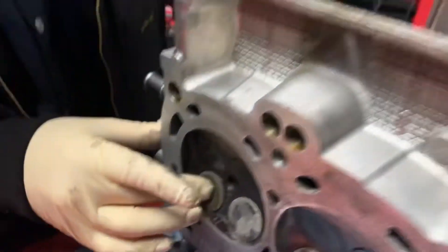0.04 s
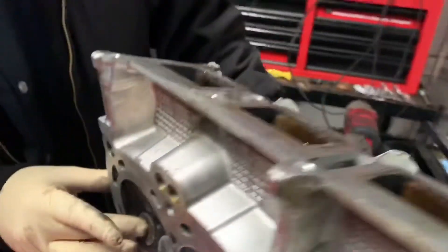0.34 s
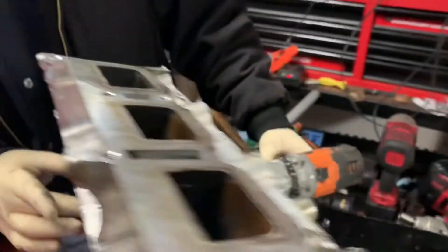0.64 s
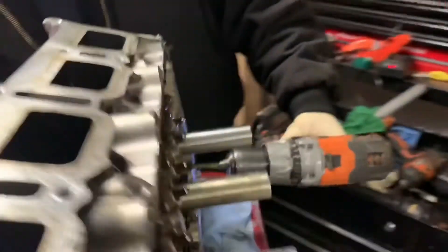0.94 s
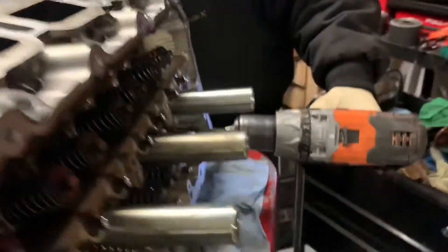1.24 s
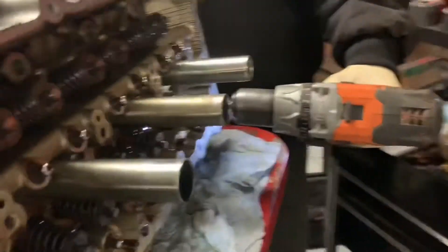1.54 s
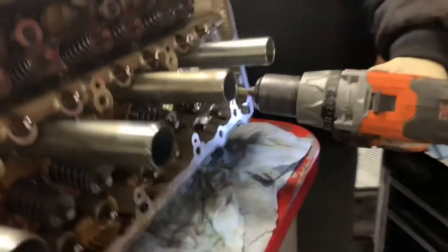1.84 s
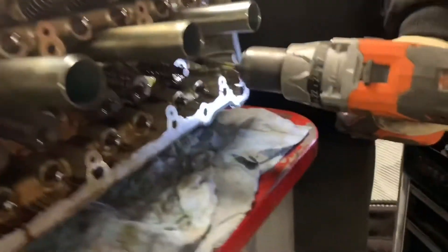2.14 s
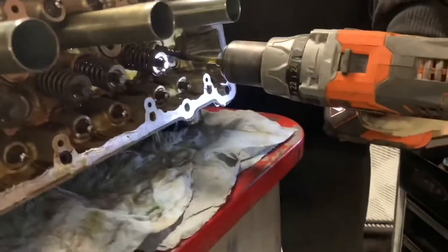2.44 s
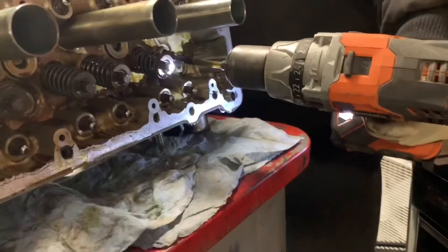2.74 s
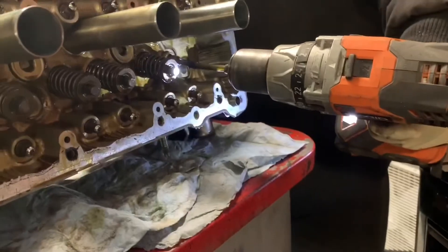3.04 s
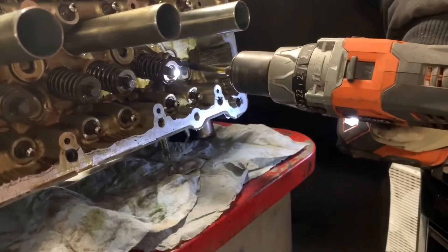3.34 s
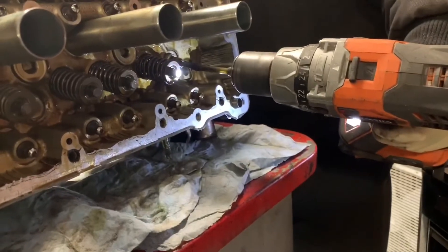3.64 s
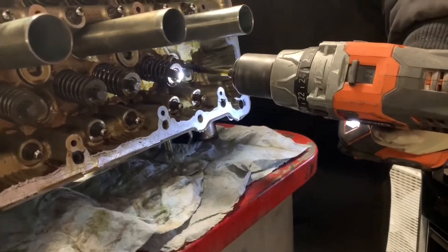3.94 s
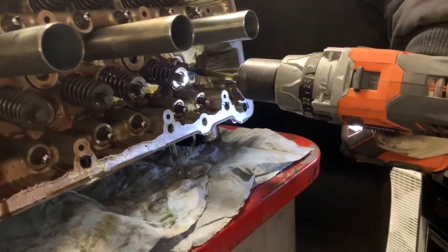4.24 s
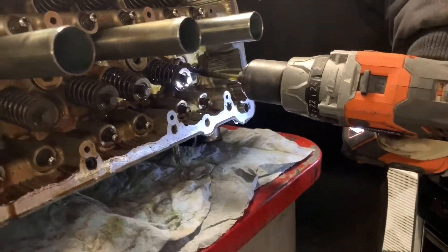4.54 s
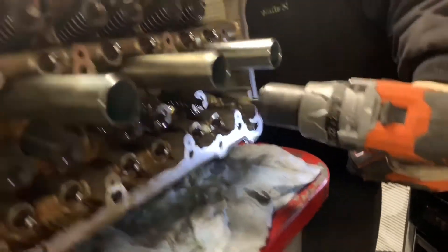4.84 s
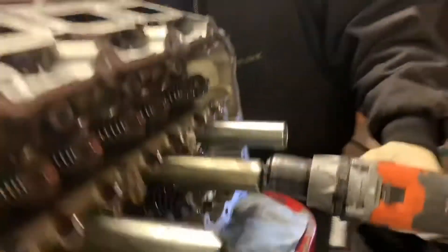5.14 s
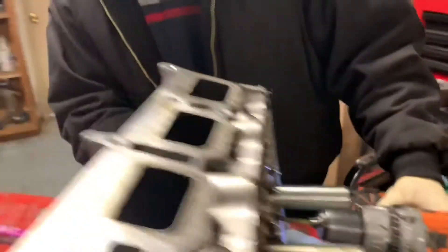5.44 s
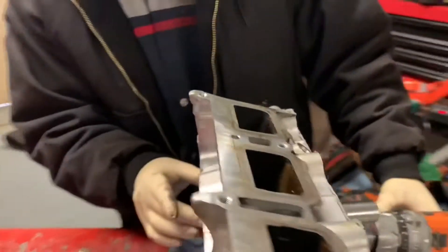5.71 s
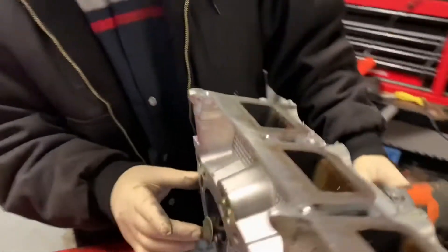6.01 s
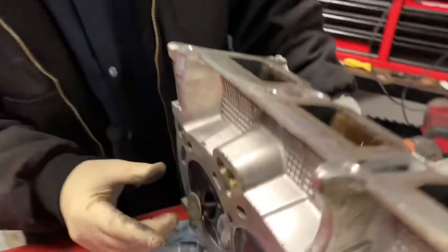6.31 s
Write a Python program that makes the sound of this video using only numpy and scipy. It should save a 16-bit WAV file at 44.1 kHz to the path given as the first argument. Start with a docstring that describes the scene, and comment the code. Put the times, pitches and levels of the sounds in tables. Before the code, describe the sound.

Already running, a cordless drill whirs at a constant pitch, with a hissing fan and rasping gears, while an engine valve grinds on and off in its metal seat. A soft thump hits the microphone near the start. The drill gets louder as the microphone nears, then eases off, ticks and cuts out after almost six seconds, leaving quiet workshop air.

```python
"""Lapping a valve with a cordless drill

In a small workshop a drill spins an engine valve against its seat in an aluminium cylinder head.
The motor whines, its fan and brushes hiss, the gearbox rasps, and paste grinds and bites in the seat.
A hand-held phone is bumped, moves up to the drill and back again; then the trigger is let go."""
import sys
import numpy as np
from scipy import signal
from scipy.fft import rfft, irfft
from scipy.io import wavfile
from scipy.ndimage import map_coordinates

SR = 44100
rng = np.random.default_rng(int(sys.argv[2]) if len(sys.argv) > 2 else 0)


def bounce(signal):
    """Save signal as a 16-bit WAV file at the path given by the first command-line argument."""
    frames = np.transpose(np.atleast_2d(signal))
    limited = np.clip(frames, -1, 1)
    pcm = np.round(limited * 32767).astype(np.int16)
    wavfile.write(sys.argv[1], SR, pcm)


N = 280917
T = np.arange(N) / SR
HZ = np.fft.rfftfreq(N, 1 / SR)
TRIGGER_OFF_S = 5.786
FLUTTER_DB = 1.2  # quick shimmer on the motor and gear tones


# Motor speed, wavering with the load: time_s, shaft_hz
SHAFT_SPEED = [(0.0, 262.4), (0.36, 264.9), (0.57, 264.2), (0.67, 264.5), (0.95, 263.6), (1.29, 261.8),
               (1.5, 261.5), (1.81, 264.3), (2.31, 263.2), (2.73, 263.3), (3.13, 265.5), (3.41, 265.3),
               (3.55, 264.3), (3.89, 264.2), (4.15, 265.6), (4.5, 265.4), (5.24, 261.9), (5.67, 264.0)]

def shaft():
    """Turns the motor has made so far, with a slight flutter in its speed."""
    shaft_hz, = curves(SHAFT_SPEED)
    return np.cumsum(shaft_hz * (1 + .00016 * drift(45))) / SR


# Lead tones, swelling and fading as the phone moves: {shaft_multiple: rows of time_s, level_db}
WHINE_LEVELS = { 5: [(0, -49), (.3, -47), (.5, -54), (.85, -43.5), (1.25, -56), (1.47, -42), (1.75, -48),
                (2, -42), (2.4, -48), (2.75, -44), (3.3, -47.5), (4.3, -47.5), (4.87, -43), (5.2, -55),
                (5.8, -62)], 6.28: [(0, -60), (.7, -52), (1, -37.5), (1.25, -48), (1.9, -53), (2.4, -45),
                (4.8, -44), (5.05, -55), (5.35, -43.5), (5.75, -57)], 7.5: [(0, -62), (.5, -56), (1, -39.5),
                (1.4, -36.5), (1.65, -42), (1.95, -53), (2.2, -43.5), (4.65, -43), (4.9, -54), (5.2, -48),
                (5.45, -59)], 10: [(0, -45), (.1, -42), (.28, -44), (.37, -52), (.48, -37), (.8, -42),
                (1.02, -35.5), (1.15, -50), (1.35, -40), (1.85, -42), (2.05, -34), (2.25, -31.5),
                (2.7, -38.5), (3, -32.5), (3.2, -37.5), (3.85, -31.5), (4.3, -37), (4.65, -31.5),
                (4.92, -36), (5.2, -51), (5.55, -46), (5.67, -38.5), (5.78, -48)], 15: [(0, -48),
                (.45, -38.5), (.62, -43), (.78, -36), (.95, -42), (1.18, -27), (1.32, -43), (1.47, -32.5),
                (1.9, -44), (2.1, -32.5), (2.55, -39), (2.85, -33), (3.2, -30), (3.8, -35.5), (4.1, -32),
                (4.7, -40), (4.92, -31), (5.08, -38), (5.3, -26.5), (5.55, -35), (5.78, -48)],
                16: [(0, -53), (.45, -43), (.7, -51), (1.65, -36), (2.2, -39), (2.5, -47), (4.2, -45),
                (4.9, -39.5), (5.3, -49)], 20: [(0, -46), (.35, -35.5), (.55, -43), (.7, -36), (.95, -45),
                (1.4, -35), (1.75, -28), (2, -39), (2.3, -29.5), (2.85, -27), (4.78, -28), (4.97, -40),
                (5.15, -34), (5.6, -39), (5.78, -52)], 21: [(0, -55), (.45, -39.5), (1.25, -48),
                (1.85, -35), (2, -47), (2.2, -34), (2.4, -46), (2.65, -35), (3.55, -30.5), (3.95, -37),
                (4.25, -33), (4.7, -43), (5, -38), (5.15, -50)], 25: [(0, -45), (.45, -35), (.62, -45),
                (.8, -35), (1.05, -44), (1.6, -35), (1.95, -26.5), (2.2, -31), (3.4, -27.5), (4.6, -31),
                (4.85, -26.5), (5.1, -42), (5.6, -37), (5.8, -49)], 35: [(0, -45), (.4, -36), (1.55, -37),
                (1.9, -24), (2.2, -26), (2.42, -33), (2.8, -26), (3.3, -22.5), (4.05, -24.5), (4.45, -31),
                (4.75, -27.5), (5.3, -37), (5.8, -43)], 40: [(0, -47), (.15, -35), (1.1, -33), (1.65, -39),
                (1.85, -30), (2.2, -29), (2.38, -39), (2.6, -30), (3, -38), (3.3, -28.5), (3.75, -45),
                (4.3, -31), (4.85, -31), (5.65, -35), (5.8, -48)], }

def whines(turns):
    """The strongest tones of the motor and gears; the brushes make them flutter."""
    out = 0
    for multiple, levels in WHINE_LEVELS.items():
        db, = curves(levels)
        out += undb(db + FLUTTER_DB * drift(35)) * tone(multiple * turns + rng.random())
    return out


# Lesser motor tones: shaft_multiple, close_level_db, fall_db_per_hiss_db
MOTOR_TONES = [(1, -66, 1.8), (14, -49, .8), (17, -47, .6), (18, -48, .6), (18.5, -44, 1), (19, -41, 1.1),
               (22, -43, .5), (22.5, -43, .8), (23, -46, .6), (24, -39, .7), (26, -42, .3), (27, -41, 1),
               (29, -38, 2), (30, -41, .5), (31, -39, .7), (32, -41, 1), (34, -35.5, 1.6), (36, -35, 1.6),
               (37, -37, 1.3), (39, -42, 1.4), (41, -42, 1), (42, -43, 1), (45, -37.5, .9), (46, -45, 1),
               (50, -41, 1.2), (55, -35, 2.6)]
# Gear mesh tones: shaft_multiple, close_level_db, fall_db_per_roar_db
MESH_TONES = [(3.78, -53.5, 1.2), (4.2, -58, .8), (9, -48.5, .6)]

def partials(turns, table, near_db):
    """Tones locked to the shaft flutter, and fade in the standing waves, more so far from the drill."""
    fade_db = 1.5 + .22 * np.maximum(-near_db, 0)
    out = 0
    for multiple, db, fall in table:
        gain = undb(db + fall * near_db + fade_db * drift(2.48) + FLUTTER_DB * drift(35))
        out += gain * tone(multiple * turns + rng.random())
    return out


# The whistle and its octave as the phone moves through standing waves: time_s, level_db
WHISTLE_LEVELS = [(0, -48), (.08, -44), (.25, -53), (.55, -42), (.8, -49), (3.3, -47), (5.8, -55)]
OCTAVE_LEVELS = [(0, -43), (.09, -35.5), (.27, -43), (.45, -39), (.7, -49), (.9, -35.5), (1.15, -34),
                 (1.35, -44), (1.6, -34.5), (1.88, -48), (2.05, -38), (2.38, -33.5), (2.65, -41),
                 (4.3, -42.5), (4.78, -32.5), (5.05, -44), (5.35, -38.5), (5.6, -39), (5.8, -52)]

def controller(pitch_hz=1922.6):
    """The speed controller's whistle holds its pitch and cuts out with the trigger."""
    whistle_db, = curves(WHISTLE_LEVELS)
    octave_db, = curves(OCTAVE_LEVELS)
    powered = np.clip((TRIGGER_OFF_S - T) / .005, 0, 1)
    return powered * (undb(whistle_db) * tone(pitch_hz * T) + undb(octave_db) * tone(2 * pitch_hz * T))


# Tone colour of the fan and brushes: freq_hz, close_gain_db, far_gain_db
HISS_EQ = [(2500, -44, -44), (4000, -11, -11), (5200, -6.5, -6), (5900, -2, -2), (6900, -1.8, -1.3),
           (7600, 1.6, 0), (8200, .8, -.3), (9500, .8, .8), (10400, -.8, -.5), (11500, -5.3, -4),
           (12800, -6, -6), (14500, -7.2, -8), (15800, -13, -11.5)]

def hiss(turns, near_db):
    """Fan and brush noise pulses once a turn; part of it repeats with the commutator's worn track."""
    track = signal.resample(rng.standard_normal(120), 2048)
    repeating = np.interp(turns % 1, np.linspace(0, 1, len(track)), track)
    air = unit(grit(spread_db=.5)) * (1 + .088 * np.cos(2 * np.pi * turns)) + undb(-20) * repeating
    close = colour(air, [(hz, db) for hz, db, _ in HISS_EQ])
    distant = colour(air, [(hz, db) for hz, _, db in HISS_EQ])
    far = np.clip(-near_db / 6, 0, 1)  # fully distant at 6 dB down
    return ((1 - far) * close + far * distant) * undb(.38 * drift(14))


# Tone colour of the gearbox's rasp and of its hollow roar in the head: freq_hz, gain_db
RASP_EQ = [(200, -41), (500, -16), (950, -3.5), (2300, -11.5), (2800, 0), (3400, 2.5), (4200, 1.5),
           (5400, -6.5), (8000, -38)]
ROAR_EQ = [(400, -35.5), (600, -4), (850, -11), (1020, -7.5), (1250, 5), (1550, 4.5), (2050, 8), (2450, 7),
           (3000, -10.5), (4000, -40)]

def gearbox(turns, eq, throb, spread_db):
    """Teeth rattle in the housing, harder once a turn."""
    teeth = grit(spread_db) * (1 + throb * np.cos(2 * np.pi * turns))
    return colour(teeth, eq) * undb(.5 * drift(18))


# The head shades and reflects the gearbox on the way back: centre_s, length_s, roar_db, rasp_db
SHADING_PASSES = [(4.883, 0.39, 0, 2.5), (5.11, 0.089, 4, 2.5), (5.723, 0.96, -1, 2)]

def gearbox_faders(near_db):
    """Level changes in dB for roar and rasp: both fall off with distance more gently than the hiss."""
    roar_db = .74 * near_db + sum(db * swell(s, length) for s, length, db, _ in SHADING_PASSES)
    rasp_db = .35 * near_db + sum(db * swell(s, length) for s, length, _, db in SHADING_PASSES)
    return roar_db, rasp_db


# The phone passes over the head's open ports: centre_s, length_s, roar_db, rasp_db
OPENING_PASSES = [(.85, 0.62, -56.5, -40.5), (1.38, 0.81, -34, -35.5)]

def openings(turns):
    """The gearbox sounds through the head's open ports, straight onto both sides of the phone."""
    roar_gain = sum(undb(db) * swell(s, length) for s, length, db, _ in OPENING_PASSES)
    rasp_gain = sum(undb(db) * swell(s, length) for s, length, _, db in OPENING_PASSES)
    roar = roar_gain * gearbox(turns, ROAR_EQ, throb=.23, spread_db=3.5)
    return roar + rasp_gain * gearbox(turns, RASP_EQ, throb=.1, spread_db=5)


# Body of the drill's housing: pitch_hz, width_hz, gain_db
HOUSING_MODES = [(215, 850, -41.5)]

def housing(near_db):
    """The drill's housing drones low, heard only close up."""
    return ring(grit(spread_db=-4), HOUSING_MODES, [(260, 650, 2.7)]) * undb(6 * near_db)


# The valve is pressed onto the paste: start_s, length_s, relative_db
VALVE_PRESSES = [(0, 0.026, -46), (0.371, 0.47, -37.5), (1.824, 1.2, -35.5), (3.114, 0.62, -38.5),
                 (4.336, 0.64, -37.5), (5.035, 0.33, -40.5), (5.72, 0.041, -49.5)]
# Ring of the cylinder head under the valve: pitch_hz, width_hz, gain_db
HEAD_MODES = [(584, 35, 11), (668, 47, 9), (746, 62, -11)]

def grinding(attack_s=.018, crush_db_per_s=8, release_s=.024):
    """Grains in the seat ring the head; each press grows quieter as the grit is crushed."""
    pressure = 0
    for start, length, db in VALVE_PRESSES:
        age = since(start)
        held = np.minimum(age / attack_s, 1) * np.exp(-since(start + length) / release_s)
        pressure += undb(db - crush_db_per_s * age) * held
    return pressure * unit(ring(grit(spread_db=2), HEAD_MODES, [(657, 270, 0)]))


# The paste bites: start_s, decay_s, relative_db, pitch_hz
PASTE_BITES = [(0, .008, -32, 720), (.38, .015, -35, 790), (.822, .025, -32, 680), (.93, .018, -35, 660),
               (1.81, .01, -27, 700), (2.133, .024, -35.5, 680), (2.208, .009, -31.5, 720),
               (3.138, .022, -31, 750), (3.178, .015, -40, 610), (3.283, .014, -36, 770),
               (3.298, .018, -32, 700)]
# Ring of the breaking grains: pitch_hz, width_hz, gain_db
GRAIN_MODES = [(740, 380, 0)]

def bites(sag_hz_per_s=1000, jitter=.06):
    """The valve grips and judders free with a gritty, uneven groan that sags in pitch."""
    uneven = 1 + jitter * drift(260)
    groans, grips = 0, 0
    for start, decay, db, hz in PASTE_BITES:
        age = since(start)
        grip = undb(db) * 2 * (1 - np.exp(-4 * age / decay)) * np.exp(-age / decay)
        slip_hz = (hz - sag_hz_per_s * np.minimum(age, 2 * decay)) * uneven
        groans += grip * tone(np.cumsum(slip_hz) / SR)
        grips += grip
    crunch = unit(ring(grit(spread_db=4.5), GRAIN_MODES, GRAIN_MODES))
    return undb(-4.5 + 2 * drift(130)) * groans + undb(-9) * grips * crunch


# Ring of the steel spark plug tubes: pitch_hz, width_hz, gain_db
TUBE_MODES = [(3900, 42, -5), (4490, 430, 9)]
# The phone passes their mouths: centre_s, length_s, level_db
TUBE_SWELLS = [(1.54, 0.33, -29.5), (4.885, 0.46, -38), (5.33, 0.078, -37)]

def tubes():
    """The spark plug tubes ring with the grinding, heard only as the phone passes close."""
    gain = sum(undb(db) * swell(s, length) for s, length, db in TUBE_SWELLS)
    return gain * unit(ring(grit(spread_db=-5.5), TUBE_MODES, TUBE_MODES))


# Hits of the chuck and of the gears: start_s, relative_db
CHUCK_TICKS = [(5.073, -23), (5.108, -26), (5.139, -24), (5.34, -26), (5.972, -42), (6.04, -43),
               (6.0916, -46), (6.119, -46), (6.2883, -42)]
GEAR_CLACKS = [(5.796, -27), (5.868, -35)]
# Ring of the chuck and of the gear case: pitch_hz, width_hz, gain_db
CHUCK_MODES = [(3850, 2000, 0)]
GEAR_CASE_MODES = [(920, 150, 7.5)]

def ticks_and_clacks():
    """The chuck ticks in its play, under load and coming to rest; the gears clack as the motor brakes."""
    ticks = ring(bursts(CHUCK_TICKS, decay_s=.0015), CHUCK_MODES, CHUCK_MODES)
    clacks = ring(bursts(GEAR_CLACKS, decay_s=.008), GEAR_CASE_MODES, GEAR_CASE_MODES)
    return undb(9) * ticks + clacks


# Fingers bump the phone: start_s, relative_db, contact_s
FINGER_BUMPS = [(0.327, -9.5, 0.0095), (0.383, -13, 0.0074), (0.401, -2, 0.0041), (0.4129, 5, 0.0074),
                (0.43, -8, 0.0011)]
# Body of the phone's case in the hand: pitch_hz, width_hz, gain_db
PHONE_MODES = [(48.8, 27, -10.5), (117.5, 48, -9.5), (247, 64, -13.5), (388, 260, -4.5)]

def bumps():
    """Soft pushes on the phone's case; the shorter the contact, the brighter the thud."""
    pushes = sum(undb(db) * np.sin(np.pi * np.clip((T - start) / contact, 0, 1)) ** 2
                 for start, db, contact in FINGER_BUMPS)
    thud = .81 * ring(pushes, PHONE_MODES)
    # the bending wave reaches the far microphone later
    return np.array([np.interp(T - .00045, T, thud), thud])


# Tone colour of the sleeve: freq_hz, gain_db
SLEEVE_EQ = [(200, -11.5), (900, 4), (1900, -4), (3000, 3), (5500, -23), (7200, -3), (10000, -10),
             (15000, -26.5)]

def sleeve():
    """A sleeve brushes past once the drill has stopped."""
    return undb(-58) * swell(6.295, .087) * colour(grit(spread_db=-3), SLEEVE_EQ)


# Tone colour of the workshop's air: freq_hz, gain_db
ROOM_TONE_EQ = [(15, -38.5), (25, -4.5), (85, -8), (233, -20), (264, -21), (356, -15.5), (425, -26),
                (506, -14), (667, -26), (1730, -24), (2200, -28.5), (7590, -39.5), (10000, -46.5),
                (14000, -60), (22000, -120)]

def room_tone(level_db=-51.84, hum_db=-60):
    """Low rumble of the workshop's air, with mains hum."""
    air = [colour(rng.standard_normal(N), ROOM_TONE_EQ) for _ in range(2)]
    hum = np.sin(2 * np.pi * 120 * T)
    return diffuse(*air, split_hz=207) * undb(level_db + drift(7.4)) + undb(hum_db) * hum


def reflections(send, t60_s=.15, positions=3):
    """Dense echoes from the bench, tool chests and walls; their pattern changes as the phone moves."""
    out = 0
    for centre_s in np.linspace(0, T[-1], positions):
        tail = rng.standard_normal((2, N)) * np.exp(-np.log(1000) * T / t60_s) * (T > .004)
        response = diffuse(*tail, split_hz=710)[:, :SR // 2]
        response /= np.sqrt(np.sum(response ** 2, axis=1, keepdims=True))
        crossfade = np.sqrt(np.clip(1 - np.abs(T - centre_s) * (positions - 1) / T[-1], 0, 1))
        out += signal.fftconvolve((send * crossfade)[None], response, axes=1)[:, :N]
    return out


def diffuse(a, b, split_hz):
    """Two unrelated sounds as a diffuse field: long waves reach both microphones alike."""
    width = .15 + .85 / (1 + (split_hz / (HZ + 1)) ** 6)
    side = irfft(rfft(b) * width / np.sqrt(1 + width ** 2), N)
    mid = irfft(rfft(a) / np.sqrt(1 + width ** 2), N)
    return np.array([mid + side, mid - side])


# Phase lead of the left microphone: freq_hz, lead_rad
LEFT_LEAD = [(0, 0), (1210, -0.4), (2070, -0.1), (2640, 1.4), (3000, 2.3), (3840, 2.2), (3930, 1.0),
             (4300, 1.6), (4800, 2.9), (5600, 3.3), (6200, 3.9), (6550, 4.8), (7670, 6.2), (8700, 6.35),
             (10300, 8.3), (11000, 9.35), (12350, 9.5), (13800, 12.5), (16600, 12.7)]

def microphones(x):
    """Direct sound reaches the left microphone a little before the right."""
    lead = np.interp(HZ, *np.transpose(LEFT_LEAD))
    return np.array([x, irfft(rfft(x) * np.exp(-1j * lead), N)])


def undb(db):
    """Decibels to gain."""
    return 10 ** (np.asarray(db) / 20)


def unit(x):
    """Scale to rms 1."""
    return x / np.sqrt(np.mean(x ** 2))


def tone(cycles):
    """A sine at rms 1."""
    return np.sqrt(2) * np.sin(2 * np.pi * cycles)


def since(start_s):
    """Seconds since a cue, zero before it."""
    return np.maximum(T - start_s, 0)


def curves(table):
    """The columns of a table of timed rows, sample by sample."""
    times, *columns = np.transpose(table)
    return [np.interp(T, times, column) for column in columns]


def drift(rate_hz):
    """Smooth random drift with a spread near 1."""
    knots = rng.standard_normal(400)
    return 1.55 * map_coordinates(knots, [T[::64] * rate_hz], order=2, mode="wrap").repeat(64)[:N]


def swell(centre_s, length_s):
    """A smooth rise and fall."""
    return np.exp(-2 * ((T - centre_s) / length_s) ** 2)


def grit(spread_db):
    """Dense tiny impacts of unequal size; the sign of the spread does not matter."""
    return rng.standard_normal(N) * undb(spread_db * rng.standard_normal(N // 40 + 1).repeat(40)[:N])


def bursts(hits, decay_s):
    """Short bursts of contact noise, one for each (start_s, level_db) row."""
    envelope = sum(undb(db) * np.exp(-since(start) / decay_s) * (T >= start) for start, db in hits)
    return rng.standard_normal(N) * envelope


def colour(x, eq):
    """Shape a sound with (freq_hz, gain_db) points, at rms 1."""
    hz, db = np.transpose(eq)
    gain = undb(np.interp(np.log(HZ + 1), np.log(hz), db))
    low_cut = 1 / np.sqrt(1 + (hz[0] / 2 / (HZ + 1)) ** 4)
    return unit(irfft(rfft(x) * gain * low_cut, N))


def ring(x, *banks):
    """Pass a sound through banks of (pitch_hz, width_hz, gain_db) resonances, one after another."""
    for modes in banks:
        x = sum(undb(db) * signal.lfilter(*signal.iirpeak(hz, hz / width, SR), x)
                for hz, width, db in modes)
    return x


# Fader ride on the hiss as the phone moves up to the drill and back: time_s, relative_db
HISS_RIDE = [(0, -31), (.5, -27.5), (.7, -25.5), (1.25, -21), (1.9, -20), (2.55, -19), (3.55, -19),
             (4.9, -19.5), (5.15, -21.5), (5.28, -23.5), (5.78, -26.5)]

def scene():
    """The drill and valve, direct and through the room, with the small handling sounds."""
    ride_db, = curves(HISS_RIDE)
    near_db = ride_db + 18.5  # about 0 close up, negative farther off
    # with the trigger let go the tones die at once, the motor brakes and the gears rattle on a little
    released = since(TRIGGER_OFF_S)
    singing, running, coasting = (np.exp(-released / decay_s) for decay_s in (.01, .039, .052))
    roar_db, rasp_db = gearbox_faders(near_db)
    turns = shaft()
    tones = whines(turns) + partials(turns, MOTOR_TONES, near_db) + partials(turns, MESH_TONES, roar_db)
    tones = singing * tones + controller()
    air = running * hiss(turns, near_db) * undb(ride_db + 2)
    rasp = coasting * gearbox(turns, RASP_EQ, throb=.096, spread_db=3.5) * undb(rasp_db - 34.5)
    roar = coasting * gearbox(turns, ROAR_EQ, throb=.31, spread_db=3) * undb(roar_db - 38)
    drone = running * housing(near_db)
    valve = running * (undb(-7.5) * grinding() + bites() + tubes())
    foley = ticks_and_clacks() + sleeve()
    through_head = openings(turns)
    dip = undb(-14 * swell(5.008, .035))  # the direct rasp and roar dip briefly
    direct = tones + air + (rasp + roar) * dip + drone + valve + foley
    # only the hiss below about 9.5 kHz goes to the echoes, so they sound duller
    dull_air = signal.sosfilt(signal.butter(8, 9500, fs=SR, output="sos"), air)
    # the rattling housing radiates all round, so the room answers the rasp most
    send = (undb(-23) * tones + undb(-9) * dull_air + undb(.5) * rasp + undb(-14.5) * roar
            + undb(-4) * valve + undb(-4.5) * foley + undb(-2.5) * through_head)
    return microphones(direct) + through_head + reflections(send) + bumps() + room_tone()


def record(dry):
    """The phone cuts the top of the treble."""
    return signal.sosfilt(signal.ellip(10, .2, 80, 15780, fs=SR, output="sos"), dry)


dry = scene()
out = record(dry)
bounce(out)
```